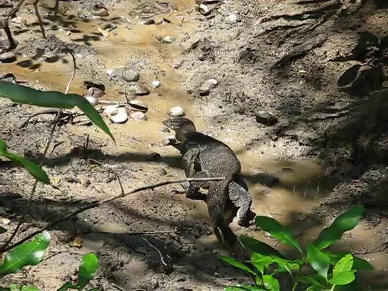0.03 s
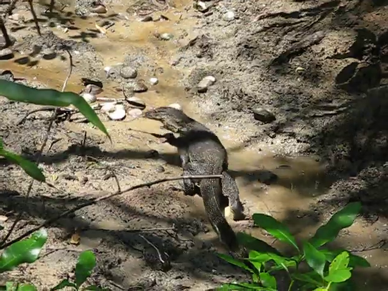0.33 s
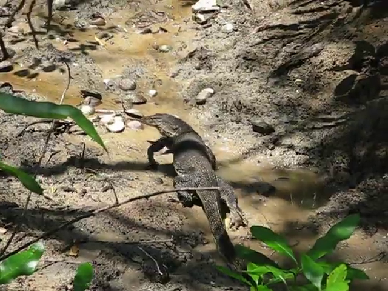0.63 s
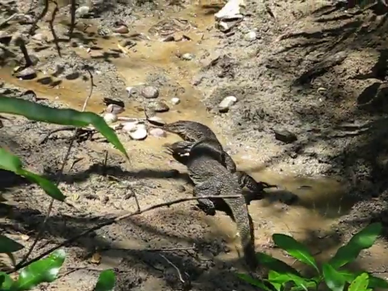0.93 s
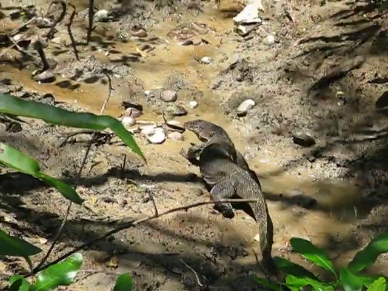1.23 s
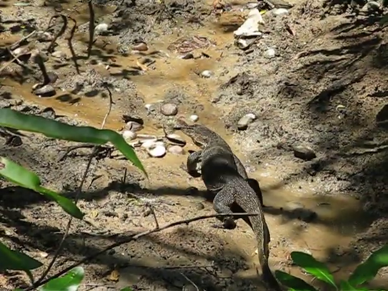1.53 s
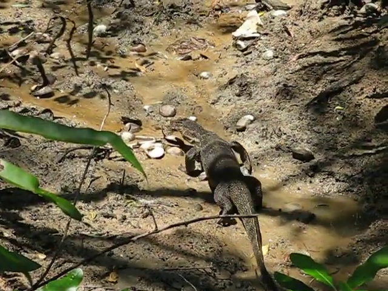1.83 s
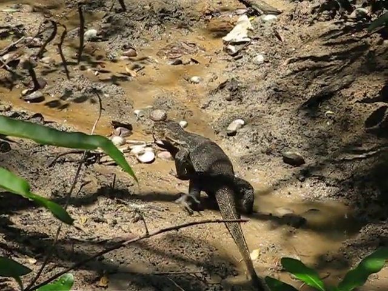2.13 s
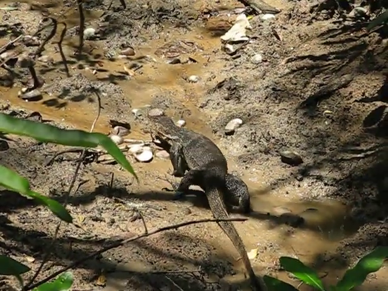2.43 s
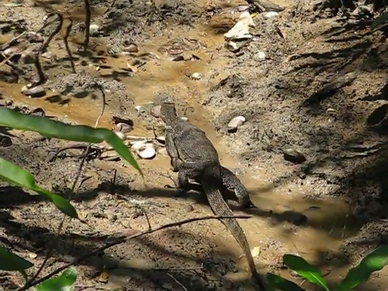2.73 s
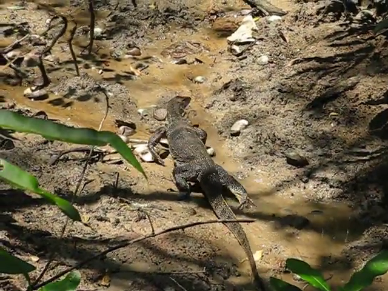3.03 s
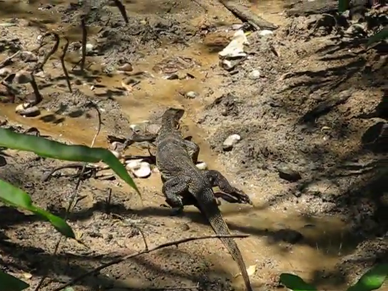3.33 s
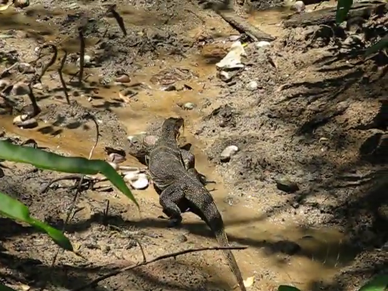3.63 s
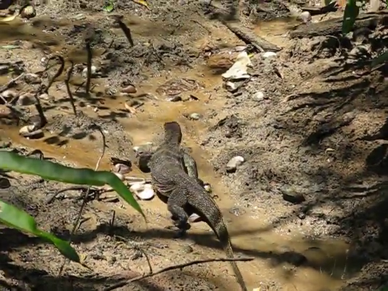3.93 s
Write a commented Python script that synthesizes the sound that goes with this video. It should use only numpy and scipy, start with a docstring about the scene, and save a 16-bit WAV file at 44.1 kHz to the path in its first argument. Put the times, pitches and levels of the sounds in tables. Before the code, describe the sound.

Small birds chirp in short whistles over faint high insects and steady outdoor noise.

```python
"""Small birds in a wooded wetland

Birds chirp in short gliding whistles, each note trailing off in the forest's echo. Insects whine
very high over a steady wash of distant noise. A few sharp, ringing clicks sound close by at the
start, soft low bumps reach the hand-held microphone, and a faint high rustle passes once."""
import sys
import numpy as np
from scipy import signal
from scipy.fft import rfft, irfft
from scipy.io import wavfile
from scipy.ndimage import uniform_filter1d

SR = 44100
rng = np.random.default_rng(int(sys.argv[2]) if len(sys.argv) > 2 else 0)


def put_to_file(sound):
    """Save the sound as 16-bit audio at rate SR, in the file named by the first command-line argument."""
    columns = np.atleast_2d(sound).T  # one column per channel
    safe = np.clip(columns, -1, 1)
    whole_steps = np.round(safe * 32767)
    wavfile.write(sys.argv[1], SR, whole_steps.astype(np.int16))


N = 176400
T = np.arange(N) / SR
HZ = np.fft.rfftfreq(N, 1 / SR)


def amp(db):
    """Decibels to gain."""
    return 10 ** (np.asarray(db) / 20)


def unit(x):
    """Scales to rms 1."""
    return x / np.sqrt(np.mean(x ** 2) + 1e-20)


def add(mix, s, sound):
    """Mixes a sound in at time s."""
    at = round(s * SR)
    sound = sound[max(-at, 0):]
    part = mix[max(at, 0):][:len(sound)]
    part += sound[:len(part)]


def noise(gain):
    """Noise of rms 1 with the given gain at each frequency."""
    return unit(irfft(rfft(rng.standard_normal(N)) * gain, N))


def coloured(colour):
    """Noise shaped by an EQ curve drawn on a log-frequency axis."""
    hz, db = np.transpose(colour)
    return noise(amp(np.interp(np.log(HZ + 1), np.log(hz + 1), db)))


def band(centre_hz, width_hz):
    """A bell-shaped band of noise."""
    return noise(np.exp(-2 * ((HZ - centre_hz) / width_hz) ** 2))


def wash(level_db=-48.5, patch_db=0.7, swell_db=.45):
    """A bed of distant outdoor noise whose colour drifts in patches and whose level swells slightly."""
    # spectrum of the bed: (frequency [Hz], relative level [dB])
    colour = [(20, -23), (35, -16), (55, -12), (82, -2.5), (110, -5), (180, -1.5), (320, 0.5), (600, -1.5),
              (1000, -5), (1500, -6.5), (1900, -8), (2600, -9), (4000, -11), (7000, -13.5), (10000, -18.5),
              (13500, -21), (15800, -26.5)]
    _, t, spectrum = signal.stft(coloured(colour), SR, nperseg=1024, noverlap=768)
    patches = uniform_filter1d(rng.standard_normal(spectrum.shape), size=10, axis=0)
    patches = unit(uniform_filter1d(patches, size=12, axis=1))
    swell = unit(uniform_filter1d(rng.standard_normal(len(t)), size=50))
    spectrum = spectrum * amp(patch_db * patches + swell_db * swell)
    return amp(level_db) * unit(signal.istft(spectrum, nperseg=1024, noverlap=768)[1][:N])


def insects(shrill_db=-67, whine_s=0.51):
    """Steady narrow choirs, and fluttering whines that sag in pitch as they run."""
    # insect choirs: (centre [Hz], width [Hz], level [dB])
    choirs = [(3160, 246, -61), (6150, 390, -68.5)]
    # the highest insects: (centre [Hz], width [Hz])
    shrill = [(12370, 440), (12740, 260)]
    # single whines: (time [s], starting pitch [Hz], level [dB])
    whines = [(-.2, 12150, -65), (.06, 12400, -73), (.73, 12130, -65), (.76, 12360, -67),
              (1.42, 12600, -72), (1.66, 12140, -66), (1.98, 12450, -66), (2.55, 12200, -79),
              (2.61, 12160, -66), (3.03, 12500, -73), (3.46, 12550, -69), (3.54, 12130, -65)]
    out = sum(amp(db) * band(hz, width) for hz, width, db in choirs)
    out += amp(shrill_db) * sum(band(hz, width) for hz, width in shrill)
    u = np.arange(0, whine_s, 1 / SR) / whine_s
    sag_hz = u * (408.8 - 137.24 * u)
    envelope = np.sin(np.pi * u ** 0.59) ** 0.37
    for s, hz, db in whines:
        tone = np.sin(2 * np.pi * np.cumsum(hz - sag_hz) / SR)
        flutter = 1 + 0.65 * band(0, width_hz=72)[:len(u)]
        add(out, s, amp(db) * unit(flutter * envelope * tone))
    return out


def bumps(sag=0.36, roughness=1.6):
    """Soft thuds on the microphone: a few uneven cycles that sink in pitch."""
    # handling bumps: (time [s], length [s], middle pitch [Hz], level [dB])
    thuds = [(.04, 0.016, 231, -50), (.085, 0.067, 112, -48), (.58, 0.067, 85, -56),
             (3.152, 0.041, 126, -49.5), (3.245, 0.046, 85.5, -45.5), (3.351, 0.055, 110, -48),
             (3.359, 0.18, 56, -61), (3.406, 0.073, 154, -47), (3.838, 0.036, 100, -51),
             (3.955, 0.047, 94.6, -42)]
    out = np.zeros(N)
    for s, length, hz, db in thuds:
        t = np.arange(0, length, 1 / SR)
        pitch = hz * (1 + sag * (1 - 2 * t / length))
        tone = np.sin(2 * np.pi * np.cumsum(pitch) / SR)
        rumble = roughness * band(hz, .75 * hz)[:len(t)]
        add(out, s, amp(db) * np.hanning(len(t)) * unit(tone + rumble))
    return out


def clicks():
    """Something small and hard snaps close by, touches again and rings briefly."""
    # resonances of the object: (frequency [Hz], relative level [dB], time to fall 60 dB [s])
    modes = [(575, -22, 0.076), (857, -6.5, 0.03), (997, 2.5, 0.0071), (1766, 4, 0.0067), (2200, -24, 0.02),
             (4300, -14.5, 0.0087), (6600, -18, .005), (9900, -24, 0.016)]
    # snaps: (time [s], peak [dB], low cut [Hz], high cut [Hz], second contact after [s], its gain [x])
    snaps = [(0.0465, -11.2, 430, 13000, 0.004, 0.21), (.2190, -28, 4300, 8500, 0.00079, 0.27),
             (.2440, -30, 1010, 2060, 0.0014, 0.2), (0.3624, -18.5, 1200, 2420, 0.00185, 0.16),
             (.5015, -39, 8500, 13000, .001, 0.13)]
    out, t = np.zeros(N), T[:2048]
    ring = sum(amp(db - 60 * t / t60) * np.sin(2 * np.pi * hz * t) for hz, db, t60 in modes)
    for s, db, low_hz, high_hz, again_s, again_gain in snaps:
        snap = signal.sosfilt(signal.butter(4, low_hz, "high", fs=SR, output="sos"), ring)
        snap = signal.sosfilt(signal.butter(2, high_hz, fs=SR, output="sos"), snap)
        snap = amp(db) * snap / abs(snap).max()
        add(out, s, snap)
        add(out, s + again_s, again_gain * snap)
    return out


def note(length, first_hz, top_hz, last_hz, peak=.5, edge=0.059, db_per_octave=0,
         trill_depth_hz=0, trill_rate_hz=130.2, waver=0.0057, fray_hz=0):
    """A bird's near-sine whistle that arches up to a top pitch and drops; it may trill or fray."""
    t = np.arange(0, length, 1 / SR)
    u = t / length  # peak (the turning point) and edge (each fade) are shares of the note
    fall = np.maximum(u - peak, 0) / (1 - peak)
    rise_hz = (first_hz - top_hz) * (1 - u / peak) ** 2
    arch_hz = top_hz + np.where(u < peak, rise_hz, (last_hz - top_hz) * fall ** 1.35)
    envelope = np.sin(np.pi / 2 * np.clip(np.minimum(u, 1 - u) / edge, 0, 1)) ** 2
    envelope *= amp(db_per_octave * np.log2(arch_hz / top_hz))  # softer below the top pitch
    wander = np.interp(u, np.linspace(0, 1, 12), rng.standard_normal(12))
    jitter = unit(uniform_filter1d(rng.standard_normal(len(t)), size=40))
    trill = trill_depth_hz * np.sin(2 * np.pi * trill_rate_hz * t)
    pitch = arch_hz * (1 + waver * wander) + trill + fray_hz * fall ** 2 * jitter
    return unit(envelope * np.sin(2 * np.pi * np.cumsum(pitch) / SR))


def leaves(x, scatter_db=-7, decay_s=.016):
    """Nearby foliage blurs the direct sound with a short cloud of echoes."""
    t = T[:2048]
    cloud = rng.standard_normal(len(t)) * np.exp(-t / decay_s)
    path = amp(scatter_db) * cloud / np.linalg.norm(cloud) + (t == 0)
    heard = signal.fftconvolve(x, path)
    return heard * np.linalg.norm(x) / np.linalg.norm(heard)


def forest(x, quick_t60=0.74, late_t60=1.1, late_db=-18.5, build_s=0.007, trunks_s=0.031):
    """Echoes off trunks and leaves: an early cluster, a quick tail and a weak long one."""
    t = T[:SR]
    tails = amp(-60 * t / quick_t60) + amp(late_db - 60 * t / late_t60)
    build = 1 - np.exp(-t / build_s)
    cluster = amp(np.exp(-((t - trunks_s) / 0.0091) ** 2))  # a 1 dB lift
    hz, age, spectrum = signal.stft(rng.standard_normal(SR), SR, nperseg=256)
    air = amp(-19 * age * (hz[:, None] / 8000) ** 2)  # the treble dies first
    scatter = signal.istft(spectrum * air, SR, nperseg=256)[1][:SR]
    echo = signal.fftconvolve(x, tails * build * cluster * scatter)
    return echo * np.linalg.norm(x) / np.linalg.norm(echo)


def birds():
    """Every call arrives twice: directly through the leaves, and as the forest's echo."""
    # faint far birds: (time [s], length [s], first [Hz], top [Hz], last [Hz], echo level [dB])
    far_notes = [(0.085, 0.04, 6950, 7150, 6880, -59), (.12, 0.092, 4900, 5860, 4940, -59),
                 (0.156, 0.037, 3940, 4050, 3870, -58), (0.336, 0.028, 5540, 6200, 5800, -57),
                 (0.393, 0.0223, 5200, 5700, 4950, -48.5), (1.068, 0.053, 6600, 7080, 6860, -57.5),
                 (1.111, 0.094, 4700, 5800, 4550, -56.5), (1.324, 0.04, 3780, 4200, 3500, -57),
                 (1.536, 0.1, 7250, 7480, 7400, -62), (1.583, 0.03, 4350, 6200, 3670, -54.5),
                 (2.305, 0.047, 6600, 7000, 6750, -59.5), (2.651, .03, 4000, 4050, 4000, -58),
                 (2.678, 0.023, 4480, 5950, 5000, -54), (2.826, 0.026, 6140, 6280, 6150, -59.5),
                 (3.202, 0.026, 5000, 5880, 4940, -54), (3.442, 0.0293, 2900, 3000, 2450, -51.5)]
    # harsh notes shaken by a fast deep trill: (time [s], length [s], pitch [Hz], echo level [dB])
    burrs = [(.403, .034, 4240, -48.5), (1.152, 0.034, 3580, -50), (3.398, .016, 3710, -53),
             (3.422, 0.027, 3830, -51)]
    # thin high calls that sweep up and level off:
    # (time [s], length [s], first [Hz], top [Hz], trill depth [Hz], echo level [dB], dry/wet [dB])
    seeps = [(0.658, 0.023, 6760, 7700, 370, -44.5, -5), (2.019, 0.018, 7040, 8000, 120, -44.5, -6),
             (2.028, 0.06, 7960, 8110, 15, -43.5, -9), (2.038, 0.022, 6180, 6850, 27, -49, -7),
             (3.57, 0.036, 6250, 7800, 450, -48, -6)]
    # plain low whistles: (time [s], length [s], pitch [Hz], echo level [dB])
    whistles = [(1.192, 0.047, 2848, -50.5), (1.262, 0.042, 2870, -51.5), (1.622, 0.033, 2850, -54.5),
                (1.68, 0.044, 2857, -50.5), (3.468, .06, 2770, -54)]
    # the nearest bird's arched chirps: (time [s], length [s], top [Hz], echo level [dB], dry/wet [dB])
    chirps = [(1.36, 0.044, 4750, -45, -3), (1.635, 0.041, 4556, -45, 1), (2.863, .044, 4582, -44.3, -2),
              (3.166, .045, 4593, -44.6, -2)]
    # quick upward flicks: (time [s], length [s], first [Hz], top [Hz], echo level [dB])
    flicks = [(2.606, 0.037, 4500, 5450, -60), (2.848, 0.0075, 4440, 5300, -55),
              (3.151, 0.0086, 4400, 5160, -52)]
    out = np.zeros(N)

    def sing(s, call, echo_db, dry_wet_db):
        """Places one call among the trees."""
        add(out, s, amp(echo_db + dry_wet_db) * leaves(call))
        add(out, s, amp(echo_db) * forest(call))

    for s, length, first, top, last, db in far_notes:
        sing(s, note(length, first, top, last), db, dry_wet_db=-6)
    sing(.371, rasp(length=0.027), echo_db=-45.5, dry_wet_db=2.5)
    for s, length, hz, db in burrs:
        sing(s, note(length, hz, hz, .88 * hz, trill_depth_hz=470, waver=0.036), db, dry_wet_db=-6)
    for s, length, first, top, depth, db, dry_wet_db in seeps:
        seep = note(length, first, top, .94 * top, peak=0.554, edge=0.034, trill_depth_hz=depth)
        sing(s, seep, db, dry_wet_db)
    for s, length, hz, db in whistles:
        sing(s, note(length, .99 * hz, hz, .99 * hz, waver=.011), db, dry_wet_db=-1)
    for s, length, top, db, dry_wet_db in chirps:
        chirp = note(length, .86 * top, top, .67 * top, peak=.38, edge=.1, db_per_octave=3, fray_hz=520)
        sing(s, chirp, db, dry_wet_db)
    for s, length, first, top, db in flicks:
        sing(s, note(length, first, top, top, peak=.9), db, dry_wet_db=0)
    return out


def rasp(length, squeak_at_s=.019, squeak_s=.0095, top_hz=4650):
    """A sharp chirp: a sizzling burst that ends in a fast arched squeak with a strong second harmonic."""
    # spectrum of the sizzle: (frequency [Hz], relative level [dB])
    colour = [(3000, -22), (4300, 5), (5300, -11), (6800, -2.5), (8200, 2), (9300, -2), (10400, -10),
              (12500, -14), (15500, -13)]
    # harmonics of the squeak, from the fundamental up: (relative level [dB])
    harmonics = [1, 4, -7]
    size = round(length * SR)
    sizzle = coloured(colour)[:size] * signal.windows.tukey(size, .12)
    arch = np.sin(np.pi * np.arange(0, squeak_s, 1 / SR) / squeak_s)
    cycles = np.cumsum(top_hz * (1 - .33 * (1 - arch))) / SR
    squeak = sum(amp(db) * np.sin(2 * np.pi * k * cycles) for k, db in enumerate(harmonics, 1))
    add(sizzle, squeak_at_s, squeak * np.sqrt(abs(arch)))
    return unit(sizzle)


def rustle(grain_db=3):
    """A brief grainy fizz high in the treble."""
    # spectrum of the fizz: (frequency [Hz], relative level [dB])
    colour = [(5000, -40), (9000, -4), (11000, -4), (13500, 3), (16000, -3)]
    # its rise and fall: (time [s], level [dB])
    envelope = [(2.46, -74), (2.52, -61), (2.545, -64), (2.567, -56.5), (2.60, -61), (2.68, -58),
                (2.74, -76)]
    grains = unit(coloured(colour) * amp(grain_db * band(0, width_hz=300)))
    return grains * amp(np.interp(T, *np.transpose(envelope), left=-120, right=-120))


def scene():
    """All sources, the same in both channels."""
    mono = wash() + insects() + bumps() + clicks() + birds() + rustle()
    return np.array([mono, mono])


def record(dry, start_s=.035, low_cut_hz=39, high_cut_hz=15850):
    """The sound opens after a moment of silence; the microphone's low cut and a steep band limit."""
    low_cut = signal.butter(3, low_cut_hz, "high", fs=SR, output="sos")
    band_limit = signal.firwin(511, high_cut_hz, window=("kaiser", 9), fs=SR)
    thinned = signal.sosfilt(low_cut, dry * (T > start_s))
    return signal.oaconvolve(thinned, band_limit[None], "same")


dry = scene()
out = record(dry)
put_to_file(out)
```